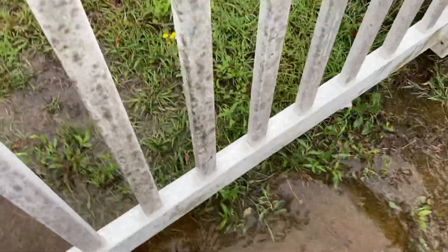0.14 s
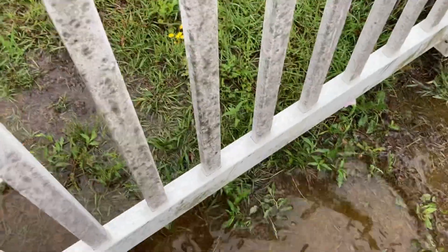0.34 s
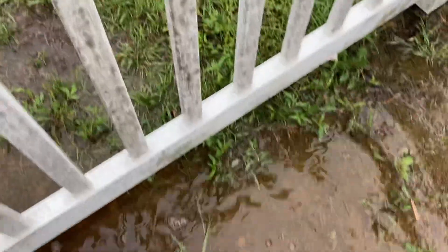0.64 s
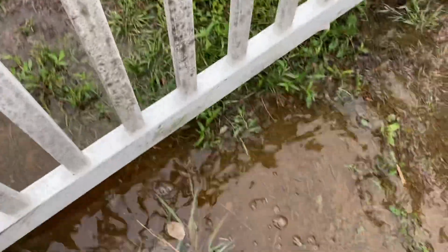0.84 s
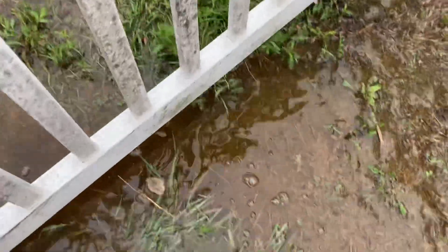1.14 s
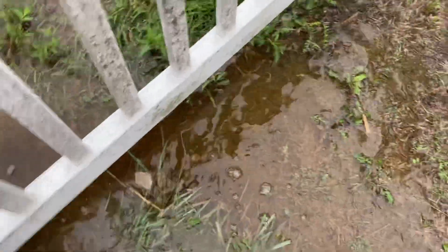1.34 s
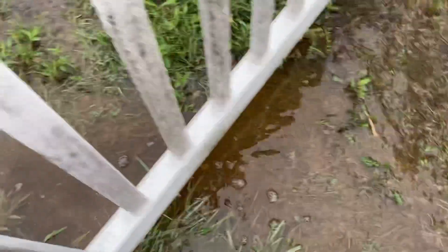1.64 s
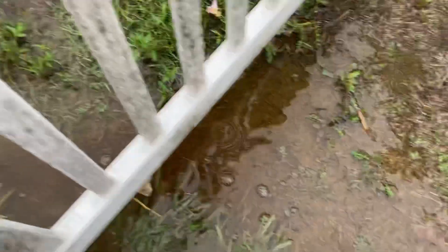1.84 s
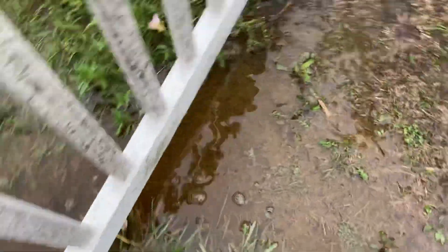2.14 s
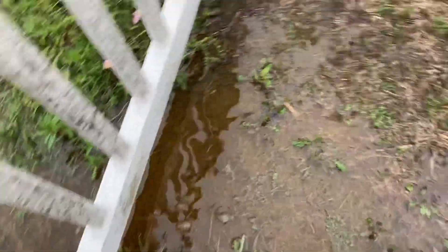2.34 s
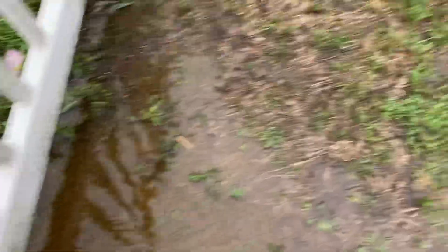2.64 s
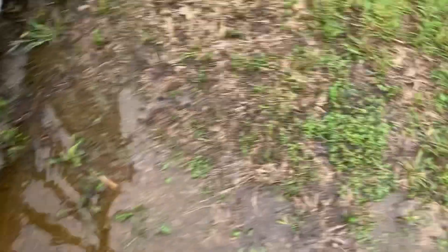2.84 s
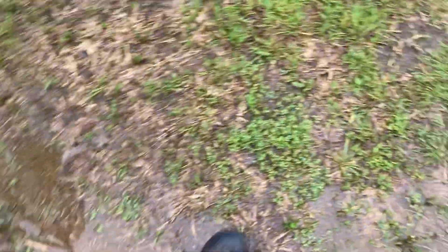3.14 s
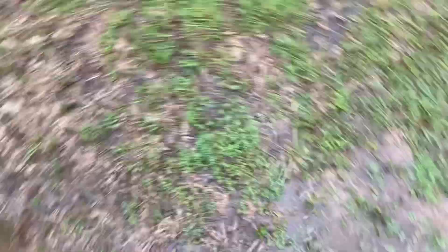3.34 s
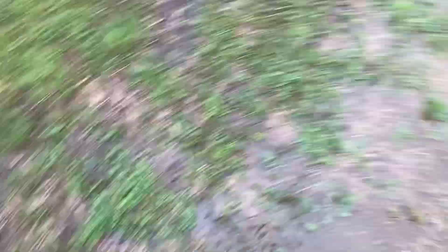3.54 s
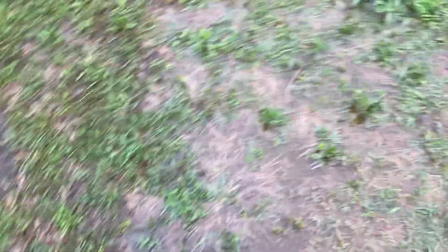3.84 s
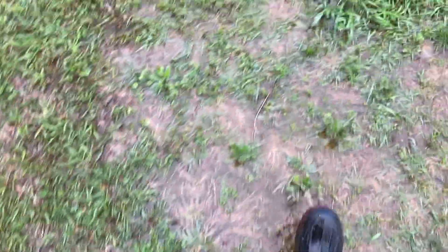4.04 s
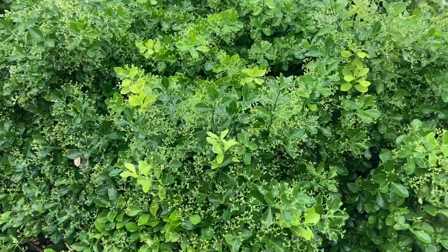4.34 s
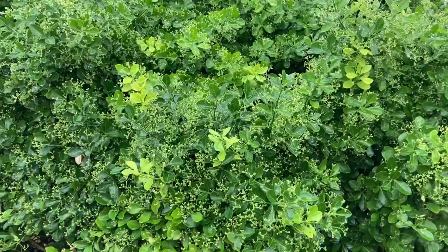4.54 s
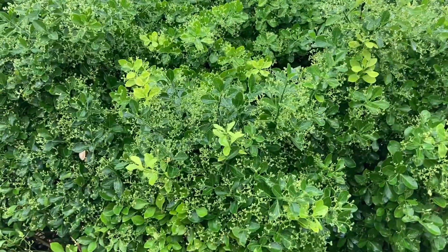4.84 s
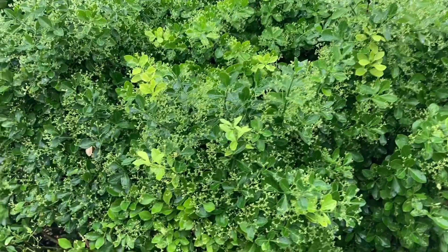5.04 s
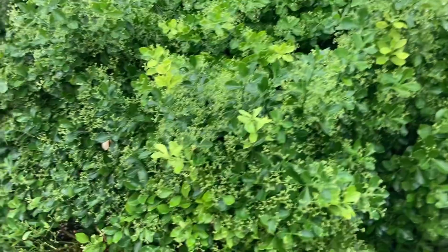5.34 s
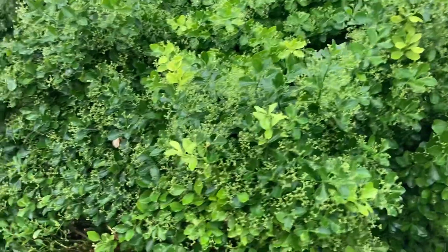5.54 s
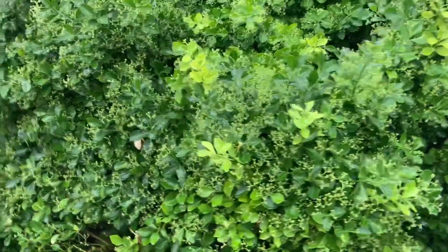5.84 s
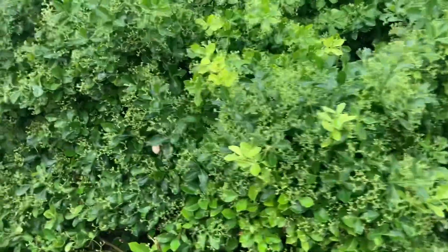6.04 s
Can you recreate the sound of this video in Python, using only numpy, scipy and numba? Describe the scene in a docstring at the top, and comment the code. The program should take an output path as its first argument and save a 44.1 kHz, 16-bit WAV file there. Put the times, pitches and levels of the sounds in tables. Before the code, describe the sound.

A boot splashes heavily into a shallow puddle with hollow knocks and gulping bubbles, squelches on soaked turf, then quiet hedge leaves and distant birds.

```python
"""Boots in puddle and mud

Boots wade through a shallow puddle and on over soaked, grassy mud, heard from just above them.
Footfalls and draining prints are clouds of ringing air pockets; struck resonances give the hollow boot.
Single bubbles are short rising sines, while droplets, mud films and twigs are ticks of filtered noise.
Then the walker stands at a hedge: coloured noise for air and leaves, far birds as soft tones and hoarse chips."""
import sys
import numpy as np
from scipy import signal
from scipy.fft import rfft, irfft, next_fast_len
from scipy.io import wavfile
from scipy.ndimage import uniform_filter1d
from numba import njit

SR = 44100
rng = np.random.default_rng(int(sys.argv[2]) if len(sys.argv) > 2 else 0)


def file_out(sig):
    """Save sig as 16-bit WAV at sys.argv[1]."""
    # one column per channel
    cols = np.atleast_2d(sig).T
    # limit, then scale
    lim = np.clip(cols, -1, 1)
    pcm = np.round(lim * 32767).astype(np.int16)
    wavfile.write(sys.argv[1], SR, pcm)


N = 272538

# The sole slaps the water; brighter means more spray and less slosh:
# (time [s], level [dB], brightness [dB], fall t60 [s])
SLAPS = [(0.564, -55, -8.5, 0.08), (1.056, -55.5, -12, 0.16), (1.084, -46.5, 9, 0.07),
         (1.2213, -18, 0.5, 0.059), (1.386, -42.5, -7, 0.062), (1.544, -23, 1, 0.1),
         (1.566, -23.5, 11.5, 0.06), (1.585, -27, -4, 0.06), (1.607, -26, -2.5, 0.05),
         (1.634, -33.5, -5, 0.06), (1.818, -30.5, 5.5, 0.11), (1.904, -39.5, -9, .09),
         (2.045, -51, -9, 0.1), (2.173, -46, 1, 0.19)]
# The boot pushes a wave ahead of it: (time [s], level [dB], brightness [dB], fall t60 [s])
WAVES = [(0.643, -51, -0.5, 0.15), (0.903, -46.5, 3.5, 0.095), (1.203, -50, 5, 0.067),
         (1.292, -47.5, 6, 0.57), (1.411, -46, -10.5, 0.11), (1.593, -34, -5.5, 0.28),
         (1.621, -37.5, -0.5, 0.17), (1.826, -34, -1.5, 0.081), (1.875, -42, 11, 0.13),
         (1.895, -41, 13, 0.094), (2.316, -52, 7.5, 0.071), (2.35, -51.5, -1.5, 0.64),
         (2.586, -58, -10.5, 0.12), (2.782, -53.5, 0, 0.11), (3.12, -66, -5.5, 0.16)]
# Mud lets go of the sole with a short smack: (time [s], level [dB], brightness [dB])
SMACKS = [(0.617, -38, 2.5), (0.709, -45.5, 8.5), (1.755, -34, -0.5), (1.858, -40.5, 13.5),
          (2.323, -35.5, 6), (2.372, -38.5, 5), (2.45, -46, 9), (2.516, -43.5, 5.5)]
# Heel and sole press into soaked turf: (time [s], level [dB], brightness [dB], fall t60 [s])
TURF_PRESSES = [(3.32, -27.5, 1, 0.071), (3.327, -17.5, 1, 0.011), (3.33, -34, 4.5, 0.18),
                (3.457, -60, 6, 0.018), (3.473, -47, -5, 0.06), (3.497, -49, -12, 0.04),
                (3.526, -46, -2, 0.034), (3.999, -56.5, 9, 0.053), (4.026, -37, 9, 0.016),
                (4.035, -56, -4, 0.22), (4.084, -37, -7, 0.037), (4.097, -45.5, 15.5, 0.053),
                (4.103, -46.5, 19, 0.064), (4.123, -38, 5, 0.062), (4.139, -34, 2, 0.04)]
SLAP_RISE_S, WAVE_RISE_S, SMACK_RISE_S, TURF_RISE_S = 0.0024, 0.0073, 0.0012, 0.0028
SMACK_T60_S = 0.039
# Colours of big, middling and tiny air pockets in water: (frequency [Hz], level [dB])
SLOSH_COLOUR = [(110, -20.5), (200, 2), (290, -0.5), (440, 3), (540, -1.5), (680, -2), (790, -12),
                (950, -10.5), (1250, -10.5), (1500, -19.5)]
SMACK_COLOUR = [(800, -13), (1200, 2), (1600, -4), (2200, 5.5), (2650, 1.5), (3200, -1), (4200, -9),
                (5200, -6)]
SPRAY_COLOUR = [(3000, -10), (4300, 6), (5400, 4.5), (7400, 4.5), (9000, 3), (11500, 5), (13500, -3),
                (16000, -6.5)]
# Colours of big and middling pockets as a sole presses into turf: (frequency [Hz], level [dB])
TURF_THUD_COLOUR = [(120, -3), (170, -2), (260, -3), (400, 3.5), (520, 2.5), (700, 0.5), (900, -9)]
TURF_SQUISH_COLOUR = [(800, -7), (1050, 0), (1350, -5.5), (1750, 5), (2100, -3), (2700, -13), (3400, -3),
                      (4600, 0)]
# Collapsing pockets per second: big, middling, tiny
UNDER_FOOT_PER_S, DRAINING_PER_S = (1800, 7000, 9000), (700, 1300, 4000)
# Big and tiny pockets against the middling ones at brightness 0: (big [dB], tiny [dB])
PUDDLE_MIX_DB, TURF_MIX_DB = (3.5, -10.5), (-13, -4.5)
# Heel blows that set the hollow boot ringing: (time [s], level [dB], contact time [s])
KNOCKS = [(1.221, -20, 0.00014), (1.227, -17, 0.00061), (1.8181, -40, 0.00062), (1.9059, -11.5, 0.0033)]
# Resonances of the boot: (frequency [Hz], level [dB], t60 [s])
BOOT_MODES = [(173, -13.5, 0.17), (288, 0.5, 0.11), (451.7, -8, 0.17), (630, -4, 0.065), (865, -8, 0.15),
              (877, -13, 0.08), (1030, -2.5, 0.085), (1540, -11, 0.045), (1790, -10, 0.1),
              (2322, -7.5, .06)]
# Large air pockets gulp shut around the boot: (time [s], level [dB], pitch [Hz], length [cycles])
GULPS = [(1.2205, -14.5, 480, 21), (1.2229, -10.5, 850, 18), (1.2246, -14, 995, 22),
         (1.243, -19.5, 260, 11), (1.266, -28, 510, 22), (1.383, -26.5, 717, 13), (1.51, -36.5, 664, 200),
         (1.546, -10.5, 670, 36), (1.58, -14.5, 766, 40), (1.567, -13, 725, 39), (1.604, -21, 445, 54),
         (1.634, -20, 677, 66), (1.619, -21.5, 726, 25), (1.657, -26, 745, 56), (1.71, -29.5, 476, 15),
         (1.819, -21, 677, 28), (1.821, -24.5, 1270, 30), (1.828, -27, 1040, 20), (1.554, -21.5, 1110, 18),
         (1.598, -23, 1300, 24), (1.645, -26.5, 1356, 32), (1.829, -27.5, 302, 60), (1.897, -29, 800, 33),
         (1.903, -19, 295, 6.5), (1.91, -9, 383.5, 19), (1.921, -18, 232, 11), (2.173, -34, 1120, 10),
         (2.515, -40, 430, 26), (2.579, -41.5, 1030, 40), (2.781, -36.5, 640, 10)]
# Single bubbles burst in the mud: (time [s], relative level [dB], pitch [Hz])
POPS = [(1.143, -40, 3670), (1.2165, -5, 2590), (1.283, -25, 2600), (1.3223, -25, 2640),
        (1.4079, -18.5, 2885), (1.5628, -7.5, 2070), (1.619, -14, 2830), (2.223, -28, 3990),
        (2.236, -28, 4100), (2.321, -15.5, 2140), (2.35, -33, 2040), (2.371, -20, 2670), (2.373, -16, 4190),
        (2.448, -49, 2270), (2.456, -26, 4800), (2.579, -38, 4460), (2.599, -39, 4300), (2.632, -39, 4060),
        (2.659, -35, 3530), (2.738, -37.5, 3180), (2.803, -41, 4670), (2.845, -35, 3300),
        (2.928, -36, 3260), (2.94, -36.5, 3930), (3.015, -39, 3660), (3.04, -37, 5380), (2.6762, -29, 2540),
        (2.678, -31.5, 3730), (2.774, -27.5, 3680), (2.789, -30, 1870), (2.8806, -27.5, 2770),
        (2.886, -29.5, 3480), (2.946, -34.5, 2270), (2.96, -35, 2260), (3.122, -41, 3550),
        (3.162, -39.5, 3550), (3.509, -32.5, 5300), (3.5235, -27.5, 1694), (3.543, -32, 2220),
        (3.6193, -27, 3280), (3.677, -34, 3630), (3.715, -35, 2490), (3.8574, -31, 4070),
        (3.9125, -31, 2985)]
# Flung droplets land on wet grass: (time [s], relative level [dB])
DROPS = [(0.045, -65), (0.14, -56), (0.263, -67), (0.41, -68), (0.838, -50), (1.0529, -48), (1.857, -50),
         (2.299, -42.5), (3.454, -62), (3.471, -44), (3.7349, -52.5), (3.8006, -47), (3.824, -49),
         (3.841, -41.5), (3.9957, -61)]
# Films of mud and wet stalks snap under the sole: (time [s], level [dB])
SNAPS = [(0.617, -62), (0.706, -53), (1.2218, -10), (1.2281, -23), (1.5392, -8.5), (3.3252, -7),
         (1.7528, -43), (2.3725, -24.5), (2.4505, -28), (2.7815, -46), (2.886, -37), (3.4535, -33.5),
         (3.471, -28), (3.495, -46), (3.5185, -33), (4.0222, -24.5), (4.0253, -24), (4.0825, -30),
         (4.0933, -15.5), (4.0973, -36), (4.1245, -22), (4.1365, -20)]
# How stirred up the puddle is, as the level of its slosh: (time [s], level [dB])
STIR = [(.5, -83.5), (.75, -60), (1.14, -59), (1.33, -42), (1.49, -52), (1.6, -36), (1.9, -42),
        (2.15, -50.5), (2.8, -62), (3.5, -62), (3.8, -73)]
STIR_SQUELCH_DB, STIR_FIZZ_DB = -15, -21.5  # against the slosh
# A boot print fills up again, squelching and fizzing: (time [s], level [dB])
DRAINS = [(2.37, -65), (2.799, -59), (2.93, -63.5), (3.039, -68.5), (3.511, -51.5), (3.8, -80)]
DRAIN_RISE_S, DRAIN_T60_S = 0.021, 0.61
DRAIN_FIZZ_DB = 3  # against the squelch of the filling prints
# The mouth of a print drains as the heel lifts: (time [s], cavity pitch [Hz], level [dB])
GURGLE = [(2.66, 1600, -80), (2.69, 1400, -52.5), (2.736, 1327, -51.5), (2.766, 1157, -61),
          (2.786, 756, -51.5), (2.837, 934, -49.5), (2.875, 1130, -58.5), (2.926, 1270, -59.5),
          (2.98, 1555, -95)]
# Colour of the fine hiss of soaked ground: (frequency [Hz], level [dB])
SEEP_COLOUR = [(1500, -16), (3300, -12), (4300, -4.5), (5600, -10.5), (7200, 1), (12000, 0), (16000, -5)]
SEEP_DB = -71.5
# The walker's weight lands on soft ground: (time [s], level [dB])
TREADS = [(1.25, -39), (1.418, -37), (1.578, -26), (1.918, -43), (2.17, -43.5), (4.1, -47.5)]
TREAD_RISE_S, TREAD_T60_S = 0.015, 0.37
# Colour of outdoor air: (frequency [Hz], level [dB])
AIR_COLOUR = [(240, 7.5), (400, 4.5), (496, 1.5), (1090, -12), (1600, -7), (2630, -11.5), (2970, -10),
              (3470, -14), (4310, -14), (5190, -22.5), (6050, -27.5), (9610, -33.5), (11900, -34),
              (16000, -48.5)]
YARD_AIR_DB = -79.5
# Course of the air moving in the hedge: (time [s], level [dB])
BREEZE = [(4.2, -70.5), (4.85, -68.5), (5.02, -64.5), (5.55, -68), (5.72, -64), (6.18, -65.5)]
# Colour of leaves: (frequency [Hz], level [dB])
LEAF_COLOUR = [(400, 15.5), (900, 9.5), (1500, 11), (2300, 5.5), (3000, -17.5), (4200, -8), (6000, -26),
               (11000, -40)]
# Leaves and twigs brush together: (time [s], level [dB], fall t60 [s])
RUSTLES = [(5.049, -67, 0.17), (5.125, -64.5, 0.14), (5.179, -61, 0.17), (5.23, -70, 0.2),
           (5.415, -60, 0.082), (5.487, -59.5, 0.062), (5.536, -60.5, .05), (5.579, -59.5, 0.068),
           (5.633, -67, 0.26), (5.714, -64.5, 0.14), (5.781, -60.5, 0.26), (5.809, -51, 0.11),
           (5.862, -56.5, 0.12), (6.031, -64.5, 0.087), (6.113, -51, 0.027), (6.16, -64, 0.47)]
RUSTLE_RISE_SHARE = 0.065  # of the fall time
# Leaves slide over each other with a bright hiss: (time [s], level [dB], fall t60 [s])
LEAF_SLIDES = [(4.5, -78.5, .2), (5.17, -72.5, .18), (5.22, -74.5, 0.17), (5.54, -72, .1),
               (5.81, -82, 0.11), (6.17, -72, 0.092)]
# Twigs tick in the hedge: (time [s], level [dB])
TWIGS = [(5.178, -61), (5.556, -53), (5.578, -49), (5.812, -43.5), (5.8625, -40.5), (6.11, -50)]
# A small far bird chirps: (time [s], mid-note pitch [Hz], relative level [dB])
CHIRPS = [(4.22, 3700, -68), (4.3, 3150, -67.5), (4.43, 2400, -73.5), (4.74, 4416, -73),
          (4.81, 3100, -66.5), (4.934, 4460, -75.5), (5.03, 3050, -66.5), (5.122, 2610, -61),
          (5.2, 4020, -66), (5.395, 4450, -75), (5.64, 2155, -59), (5.70, 2906, -65.5),
          (5.775, 4200, -77.5), (6.09, 4440, -64.5), (6.135, 4070, -64)]
CHIRP_S, CHIRP_FALL_HZ_PER_S = 0.053, 6900
# Other far birds hold a level whistle or hoot: (time [s], pitch [Hz], relative level [dB])
HELD_NOTES = [(.38, 2330, -70), (.99, 1685, -65.5), (5.205, 437.3, -52), (5.25, 428.6, -56),
              (5.335, 442, -57), (5.385, 448, -59), (5.72, 436, -60.5)]
HELD_S = 0.075
# A far bird scolds in hoarse chips: (time [s], relative level [dB])
SCOLDS = [(4.505, -61.5), (4.558, -65), (4.629, -70)]
# Resonances of its throat: (frequency [Hz], width [Hz], level [dB])
SCOLD_THROAT = [(4130, 650, 0), (2960, 240, -5)]
SCOLD_S = 0.045
# Colour of the outdoor rumble: (frequency [Hz], level [dB])
RUMBLE_COLOUR = [(18, -38), (30, -12.5), (42, -11), (59, 4.5), (124, -3), (189, -8), (290, -12.5),
                 (363, -24), (455, -28), (497, -30.5), (600, -36.5), (780, -56), (1320, -120)]
# Course of the outdoor rumble: (time [s], level [dB])
RUMBLE_LEVEL = [(0, -52.5), (2.7, -53.5), (3.7, -56), (6.18, -55)]
# The puddle lies to the left; later steps fall on the turf ahead, then the hedge takes over.
TURF_FROM_S, HEDGE_FROM_S = 3.25, 4.15
# Difference of the two microphone ports against their sum:
# (frequency [Hz], puddle [dB], turf [dB], hedge [dB])
PORTS = [(60, -13, -13, -12), (200, -11.5, -13, -7), (380, -7, -11, -5), (700, -.5, -11, -4),
         (1300, -2, -11, -5), (2400, -3.5, -7, -1), (4400, -2, -4, 0), (6000, 0, 0, 0), (15000, 0, 0, 0)]
# Directional shares of that difference, the rest is scattered: (frequency [Hz], left louder [share],
# left earlier for a source at the left [share], left earlier for one ahead [share])
BEARING = [(60, .3, .95, .5), (400, .45, .87, .2), (750, .47, .85, .2), (1100, .3, .5, -.1),
           (1500, .1, .1, -.6), (2050, -.05, -.75, -.75), (2700, -.25, .25, 0), (3300, -.2, .4, .2),
           (4200, -.2, -.4, .2), (5000, -.25, .35, .6), (6200, -.1, .55, .6), (7900, 0, -.8, -.8),
           (10500, 0, .65, .65), (12600, 0, -.65, -.65), (15000, 0, .4, .4)]
# The recorder's stereo processing notches sum and difference in turn:
# (frequency [Hz], mid [dB], side [dB])
STEREO_NOTCHES = [(1000, 0, 0), (1600, 0, 2), (2000, 0, 0), (2500, 0, -4), (3300, -2, 3.5), (4000, 0, 0),
                  (4600, 0, -4), (5700, -1.5, 2), (7100, 1.5, -8), (8300, 0, 1), (9200, -15, 3),
                  (10200, 0, 1), (11400, 2, -17), (12700, 0, 1), (13700, -14, 3), (15000, 0, 0),
                  (16000, 2, -7)]
CUTOFF_HZ = 16400


def splashes(puddle_db=0.0, turf_db=0.0):
    """Slaps, waves and smacks in the puddle, then turf steps, squeeze out air; each kind has its own attack."""
    puddle = [(*row, SLAP_RISE_S) for row in SLAPS]
    puddle += [(*row, WAVE_RISE_S) for row in WAVES]
    puddle += [(*row, SMACK_T60_S, SMACK_RISE_S) for row in SMACKS]
    turf = [(*row, TURF_RISE_S) for row in TURF_PRESSES]
    in_puddle = footfalls(puddle, [SLOSH_COLOUR, SMACK_COLOUR, SPRAY_COLOUR], PUDDLE_MIX_DB)
    on_turf = footfalls(turf, [TURF_THUD_COLOUR, TURF_SQUISH_COLOUR, SPRAY_COLOUR], TURF_MIX_DB)
    return from_db(puddle_db) * in_puddle + from_db(turf_db) * on_turf


def footfalls(rows, colours, mix_db, slosh_linger=1.46, slosh_late_s=0.0012, slosh_rise=0.7):
    """A footfall squeezes out three sizes of pocket; the big ones come abruptly, later, and last longer."""
    big_db, tiny_db = mix_db
    slosh = strokes([(s + slosh_late_s, db + big_db - bright, rise * slosh_rise, t60 * slosh_linger)
                     for s, db, bright, t60, rise in rows])
    smack = strokes([(s, db, rise, t60) for s, db, bright, t60, rise in rows])
    spray = strokes([(s, db + tiny_db + bright, rise, t60) for s, db, bright, t60, rise in rows])
    big = pockets(colours[0], UNDER_FOOT_PER_S[0], cycles=45, spread_db=-1.0, even_s=0.027)
    middling = pockets(colours[1], UNDER_FOOT_PER_S[1], cycles=21, spread_db=3.0, even_s=0.022)
    tiny = pockets(colours[2], UNDER_FOOT_PER_S[2], cycles=57, spread_db=1.0, even_s=0.029)
    return slosh * big + smack * middling + spray * tiny


def knocks(low_hz=130):
    """The heel meets the bottom: a soft half-sine push rings the boot, which radiates little bass."""
    force = np.zeros(N)
    for s, db, contact in KNOCKS:
        push = np.sin(np.linspace(0, np.pi, max(int(contact * SR), 4)))
        add(force, s, from_db(db) * push / push.sum())
    body = sum(from_db(db) * ring(force, hz, t60) for hz, db, t60 in BOOT_MODES)
    return signal.sosfilt(signal.butter(2, low_hz, "high", fs=SR, output="sos"), body)


def gulps(glide=0.035, swell_cycles=0.4):
    """Big trapped bubbles ring as rounded, low notes with a slight upward glide."""
    out = np.zeros(N)
    for s, db, hz, cycles in GULPS:
        add(out, s, from_db(db) * bubble(hz, cycles, glide, swell_cycles))
    return out


def pops(level_db=-10.5, crack_db=-4.0):
    """The larger bubbles burst one by one: the film cracks and the hollow rings briefly."""
    hollows = np.zeros(N)
    for s, db, hz in POPS:
        add(hollows, s, from_db(db + level_db) * bubble(hz, cycles=40, glide=.1, swell_cycles=2))
    films = [(s, db + level_db + crack_db) for s, db, hz in POPS]
    return hollows + ticks(films, t60=.014, low_hz=1500, high_hz=6000)


def crackle(drop_db=8.0, snap_db=0.0):
    """Droplets tick brightly on the blades; mud and stalks snap."""
    drops = ticks(DROPS, t60=0.0065, low_hz=3800, high_hz=15900)
    snaps = ticks(SNAPS, t60=0.002, low_hz=900, high_hz=9200)
    return from_db(drop_db) * drops + from_db(snap_db) * snaps


def wash(slosh_db=0.0, squelch_db=-1.5, fizz_db=-0.5):
    """Water runs back into the prints in uneven surges: low bubbles, a squelch and a fine fizz."""
    slosh, squelch, fizz = flow()
    surge_db = 2.8 * waver(45)
    big = pockets(SLOSH_COLOUR, DRAINING_PER_S[0], cycles=40, spread_db=4, even_s=.043)
    middling = pockets(SMACK_COLOUR, DRAINING_PER_S[1], cycles=42, spread_db=4, even_s=.06)
    tiny = pockets(SPRAY_COLOUR, DRAINING_PER_S[2], cycles=60, spread_db=5.5, even_s=.1)
    return (slosh * from_db(slosh_db) * big
            + squelch * from_db(squelch_db + surge_db) * middling
            + fizz * from_db(fizz_db + surge_db) * tiny)


def flow():
    """The stirred puddle drives slosh, squelch and fizz; the filling prints drive the upper two."""
    stir = from_db(in_time(STIR)[0])
    drain = strokes([(s, db, DRAIN_RISE_S, DRAIN_T60_S) for s, db in DRAINS])
    squelch = np.hypot(from_db(STIR_SQUELCH_DB) * stir, drain)
    fizz = np.hypot(from_db(STIR_FIZZ_DB) * stir, from_db(DRAIN_FIZZ_DB) * drain)
    return stir, squelch, fizz


def plips(over_db=3.0, low_hz=1500, high_hz=5600, per_s=150):
    """Small clear bubbles keep surfacing at random, as loud as the squelch allows."""
    out, squelch = np.zeros(N), flow()[1]
    for when, pitch, size, length in rng.random((int(per_s * N / SR), 4)):
        hz = low_hz * (high_hz / low_hz) ** pitch
        peak = squelch[int(when * N)] * from_db(over_db + 12 * (size - .5))
        add(out, when * N / SR, peak * bubble(hz, 45 + 70 * length, glide=.08, swell_cycles=9))
    return out


def trickle(over_db=-5.5, low_hz=1300, high_hz=6000):
    """Thin films of mud crackle as the prints drain, some 220 times a second."""
    colour = [(low_hz, 3), (high_hz, -6)]
    films = pockets(colour, per_s=220, cycles=10, spread_db=3.5, even_s=.3)
    return from_db(over_db) * flow()[1] * films


def gurgle(width_hz=430, hiss_db=-3.0, bubble_db=6.5, cycles=20, gap_s=.011):
    """Air sucked through the print's wet mouth hisses and bubbles; the pitch sinks and climbs again."""
    hz, db = in_time(GURGLE)
    t, start, end = np.arange(N) / SR, GURGLE[0][0], GURGLE[-1][0]
    out = from_db(db + hiss_db) * (t > start) * (t < end) * cavity(hz, width_hz)
    for k, (late, pitch, size) in enumerate(rng.uniform(-1, 1, (30, 3))):
        s = start + gap_s * (k + .4 * late)
        at = int(s * SR)
        peak = from_db(db[at] + bubble_db + 3 * size)
        add(out, s, peak * bubble(hz[at] * (1 + .13 * pitch), cycles, glide=.1, swell_cycles=1.5))
    return out


def seep(prickle_db=-2.5):
    """Soaked ground hisses finely and prickles with tiny bursting bubbles."""
    prickle = pockets(SEEP_COLOUR, per_s=250, cycles=35, spread_db=4, even_s=.3)
    return from_db(SEEP_DB) * (air(SEEP_COLOUR) + from_db(prickle_db) * prickle)


def hedge(breeze_db=0.0, rustle_db=0.0, flutter_db=-10.5):
    """Air moves through leaves in uneven swishes; single leaves flutter, a few brush together close by."""
    brush = strokes([(s, db + rustle_db, RUSTLE_RISE_SHARE * t60, t60) for s, db, t60 in RUSTLES])
    slide = strokes([(s, db, .012, t60) for s, db, t60 in LEAF_SLIDES])
    swish, rest = 0, air(AIR_COLOUR)
    for hz in np.geomspace(700, 5000, 9):  # each band swells by itself
        band = signal.sosfiltfilt(signal.butter(4, hz, fs=SR, output="sos"), rest)
        swish = swish + band * from_db(3.4 * waver(30))
        rest = rest - band
    flutter_swell = from_db(3.5 * waver(22) - 1)
    flutter = flutter_swell * pockets(LEAF_COLOUR, per_s=400, cycles=20, spread_db=3.5, even_s=.15, glide=0)
    moving_air = from_db(breeze_db) * (swish + rest) + from_db(flutter_db) * flutter
    leaves = pockets(LEAF_COLOUR, per_s=1100, cycles=28.6, spread_db=2, even_s=0.028, glide=0)
    return (from_db(in_time(BREEZE)[0]) * moving_air + brush * leaves + slide * air(SEEP_COLOUR)
            + ticks(TWIGS, t60=0.02, low_hz=551, high_hz=2427))


def birds(chirp_db=-1.5, held_db=-4.5, scold_db=-5.5):
    """Far birds give short falling chirps, longer level notes and a run of scolding."""
    chirps = far_notes(CHIRPS, CHIRP_S, -CHIRP_FALL_HZ_PER_S, clear_db=-13, blur_share=.17, broken_db=3.5)
    held = far_notes(HELD_NOTES, HELD_S, 0, clear_db=1.5, blur_share=.14, broken_db=1.5)
    return from_db(chirp_db) * chirps + from_db(held_db) * held + from_db(scold_db) * scolds()


def far_notes(rows, length, glide, clear_db, blur_share, broken_db):
    """Far, soft notes: a clear tone and its blurred scatter from the trees, broken up on the way."""
    out, t = np.zeros(N), np.arange(-length, length, 1 / SR)
    for s, hz, db in rows:
        pitch = hz + glide * t
        clear = from_db(clear_db) * np.sin(2 * np.pi * np.cumsum(pitch) / SR)
        note = clear + .6 * cavity(pitch, blur_share * hz)
        add(out, s - length, from_db(db) * np.exp(-(2 * t / length) ** 2) * note)
    return out * from_db(broken_db * waver(70))


def scolds():
    """Each hoarse chip is a puff of noise through the bird's throat."""
    out, t = np.zeros(N), np.arange(-SCOLD_S, SCOLD_S, 1 / SR)
    for s, db in SCOLDS:
        voice = sum(from_db(level) * cavity(np.full(len(t), hz), width) for hz, width, level in SCOLD_THROAT)
        add(out, s - SCOLD_S, from_db(db) * np.exp(-(2 * t / SCOLD_S) ** 4) * voice)
    return out


def ground():
    """A gently wavering outdoor rumble, swelling to a dull thud wherever the walker's weight lands."""
    shared = ports(air(RUMBLE_COLOUR) * from_db(1.0 * waver(9) - 1.5), lean=.3)
    opposed = from_db(-18) * air(RUMBLE_COLOUR) * np.array([[1], [-1]])
    weight = strokes([(s, db, TREAD_RISE_S, TREAD_T60_S) for s, db in TREADS])
    return np.hypot(from_db(in_time(RUMBLE_LEVEL)[0]), weight) * (shared + opposed)


def pockets(colour, per_s, cycles, spread_db, even_s, glide=0.086):
    """Air pockets collapse at random, each ringing at its own pitch; the flow is evened out over even_s."""
    when, size, sign, pitch = rng.random((int(per_s * N / SR), 4)).T
    low, high = colour[0][0], min(colour[-1][0], .4 * SR)
    hz = low * (high / low) ** pitch
    height_db = at_hz(colour, hz) + spread_db * np.minimum(-np.log(size), 4)
    heights = from_db(height_db) * np.sign(sign - .5)
    out = bubble_cloud(N, (when * N).astype(np.int64), hz / SR, heights, float(cycles), float(glide))
    out = np.diff(out, prepend=0)  # a pocket radiates the change of its volume flow
    power = uniform_filter1d(out ** 2, max(int(even_s * SR), 3))
    return out / np.sqrt(np.abs(power) + .01 * np.mean(out ** 2))


@njit
def bubble_cloud(size, starts, turns, heights, cycles, glide):
    """Sum of dying sines, each gliding from its own pitch (turns in cycles per sample)."""
    out = np.zeros(size)
    for k in range(len(starts)):
        length = int(cycles / turns[k])
        step = np.exp(2j * np.pi * turns[k] - np.log(1000) / length)
        bend = np.exp(2j * np.pi * turns[k] * glide / length)
        swing = heights[k] + 0j
        for i in range(starts[k], min(starts[k] + length, size)):
            out[i] += swing.imag
            swing *= step
            step *= bend
    return out


def bubble(hz, cycles, glide, swell_cycles):
    """A bursting bubble is a short sine whose pitch rises as it opens; its envelope peaks at 1."""
    age = np.arange(0, cycles, hz / SR)  # in cycles
    shape = (1 - np.exp(-age / swell_cycles)) * np.exp(-np.log(1000) * age / cycles)
    return shape / shape.max() * np.sin(2 * np.pi * age * (1 + glide * age / cycles))


def ticks(rows, t60, low_hz, high_hz):
    """Sharp, short ticks of dying band noise, given as (time [s], peak [dB])."""
    out, t = np.zeros(N), np.arange(SR // 20) / SR
    band = signal.butter(2, [low_hz, min(high_hz, .45 * SR)], "band", fs=SR, output="sos")
    for s, db in rows:
        tick = signal.sosfilt(band, rng.standard_normal(len(t)) * np.exp(-np.log(1000) * t / t60))
        add(out, s, from_db(db) * tick / np.abs(tick).max())
    return out


def cavity(hz, width_hz):
    """Turbulence rings one resonance whose pitch follows hz; rms 1."""
    noise = rng.standard_normal(len(hz)) + 1j * rng.standard_normal(len(hz))
    sway = signal.sosfilt(signal.butter(2, width_hz / 2, fs=SR, output="sos"), noise)
    return rms_one(np.real(sway * np.exp(2j * np.pi * np.cumsum(hz) / SR)))


def ring(clicks, hz, t60):
    """A unit click sets a dying sine of height 1 ringing in a two-pole resonator."""
    r, w = from_db(-60 / (t60 * SR)), 2 * np.pi * hz / SR
    return signal.lfilter([0, np.sin(w)], [1, -2 * r * np.cos(w), r * r], clicks + 1e-18)


def air(spectrum):
    """Steady noise of a given colour; rms 1."""
    size = next_fast_len(N)
    hz = np.arange(size // 2 + 1) * SR / size
    inside = (hz >= spectrum[0][0]) & (hz <= spectrum[-1][0])
    noise = rfft(rng.standard_normal(size))
    return rms_one(irfft(noise * from_db(at_hz(spectrum, hz)) * inside, size)[:N])


def stroke(s, rise, t60):
    """A push swells to its crest at s and dies away: (start [s], envelope)."""
    t = np.arange(-min(5 * rise, s), t60, 1 / SR)
    return s + t[0], np.exp(np.where(t < 0, -np.abs(t / rise) ** 1.12 / 2, -np.log(1000) * t / t60))


def strokes(rows):
    """Joint strength of pushes (time [s], level [dB], rise [s], fall t60 [s]); their powers add."""
    power = np.zeros(N)
    for s, db, rise, t60 in rows:
        start, push = stroke(s, rise, t60)
        add(power, start, (from_db(db) * push) ** 2)
    return np.sqrt(power)


def waver(rate_hz):
    """Smooth random drift, rms 1, with rate_hz knots a second."""
    knots = rng.standard_normal(int(rate_hz * N / SR) + 2)
    return rms_one(np.interp(np.arange(N) * rate_hz / SR, np.arange(len(knots)), knots))


def from_db(db):
    """Amplitude factor of a level in dB."""
    return 10 ** (np.asarray(db) / 20)


def rms_one(x):
    """Scale a sound to rms 1."""
    return x / np.sqrt(np.mean(x ** 2) + 1e-20)


def in_time(rows):
    """Columns of a curve at every sample."""
    s, *columns = np.transpose(rows)
    return [np.interp(np.arange(N) / SR, s, c) for c in columns]


def at_hz(points, hz, axis=1):
    """A column of a spectrum table on a log-frequency axis."""
    table = np.array(points)
    return np.interp(np.log(np.maximum(hz, 1)), np.log(table[:, 0]), table[:, axis])


def add(out, s, sound):
    """Mix a sound in from time s."""
    start = max(round(s * SR), 0)
    out[start:start + len(sound)] += sound[:max(N - start, 0)]


def ports(x, axis=1, bearing_axis=2, lean=1):
    """Two ports on a small body: part of their difference follows direction, the rest is scattered by ms."""
    size = next_fast_len(N + 2000)
    hz = np.arange(size // 2 + 1) * SR / size
    louder, earlier = at_hz(BEARING, hz, axis=1), at_hz(BEARING, hz, axis=bearing_axis)
    delay_s = np.interp(hz, np.linspace(0, SR / 2, 80), rng.uniform(.001, .005, 80))
    scatter = np.exp(-2j * np.pi * np.cumsum(delay_s) * SR / size)
    scattered_share = np.sqrt(1 - louder ** 2 - earlier ** 2)
    difference = lean * louder + 1j * earlier + scattered_share * scatter
    side = irfft(rfft(x, size) * from_db(at_hz(PORTS, hz, axis=axis)) * difference, size)[:N]
    return np.array([x + side, x - side])


def spread(x):
    """Bubbles and drops lie all around the boot, so their direction jumps about."""
    upper = signal.sosfilt(signal.butter(1, 500, "high", fs=SR, output="sos"), x)
    return .35 * upper * waver(90) * np.array([[1], [-1]])


def surroundings(x, near_db=-12, far_db=-24.0):
    """Legs, ground and fence scatter all but the bass at once; the yard gives a faint tail."""
    near_t60, far_t60, low_hz = .045, .4, 600
    t = np.arange(SR // 2) / SR
    echo = 0
    for db, t60 in [(near_db, near_t60), (far_db, far_t60)]:
        tail = rng.standard_normal((2, len(t))) * np.exp(-np.log(1000) * t / t60)
        echo = echo + from_db(db) * tail / np.sqrt(np.sum(tail ** 2) / 2)
    echo = signal.sosfilt(signal.butter(1, low_hz, "high", fs=SR, output="sos"), echo)
    return signal.fftconvolve(x[None], echo, axes=1)[:, :N]


def stereo_processing(x):
    """The recorder's stereo processing notches the treble of the sum and of the difference in turn."""
    size = next_fast_len(N + 2000)
    hz = np.arange(size // 2 + 1) * SR / size
    mid = irfft(rfft((x[0] + x[1]) / 2, size) * from_db(at_hz(STEREO_NOTCHES, hz, axis=1)), size)[:N]
    side = irfft(rfft((x[0] - x[1]) / 2, size) * from_db(at_hz(STEREO_NOTCHES, hz, axis=2)), size)[:N]
    return np.array([mid + side, mid - side])


def scene():
    """Steps in the puddle and on the turf, then the hedge, over a low outdoor rumble."""
    t = np.arange(N) / SR
    on_turf, at_hedge = (np.clip((t - s) / .005, 0, 1) for s in (TURF_FROM_S, HEDGE_FROM_S))
    steps = splashes() + knocks() + gulps() + pops() + crackle()
    steps = steps + wash() + plips() + trickle() + gurgle() + seep()
    near = steps * (1 - at_hedge) + hedge() * at_hedge + birds() + from_db(YARD_AIR_DB) * air(AIR_COLOUR)
    ahead = near * (on_turf - at_hedge)
    direct = ports(near * (1 - on_turf))
    direct = direct + ports(ahead, axis=2, bearing_axis=3)
    direct = direct + ports(near * at_hedge, axis=3, lean=.3)
    return direct + spread(near - ahead) + surroundings(near - .5 * ahead) + ground()


def record(dry):
    """Stereo processing notches the treble, the highest peaks are rounded and the top is cut."""
    rounded = np.tanh(stereo_processing(dry))
    return signal.sosfilt(signal.ellip(10, .2, 80, CUTOFF_HZ, fs=SR, output="sos"), rounded)


dry = scene()
out = record(dry)
file_out(out)
```